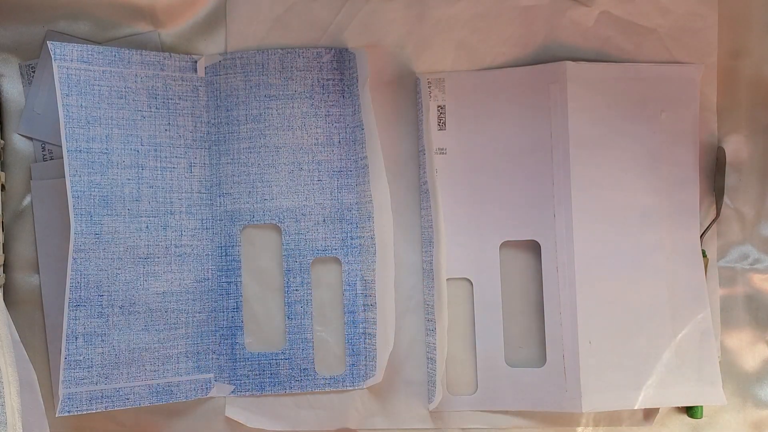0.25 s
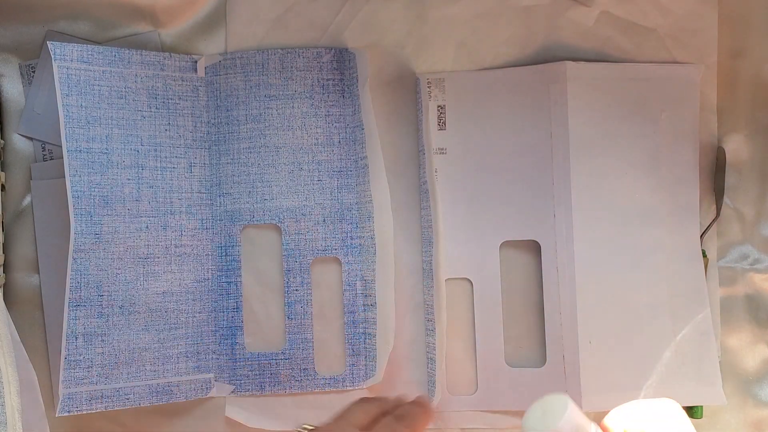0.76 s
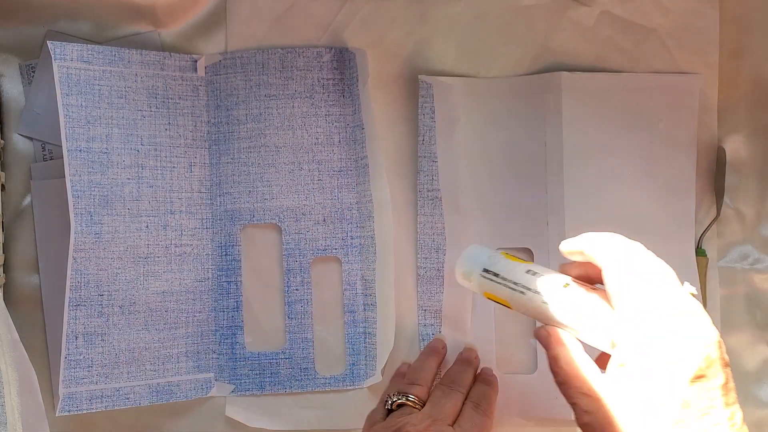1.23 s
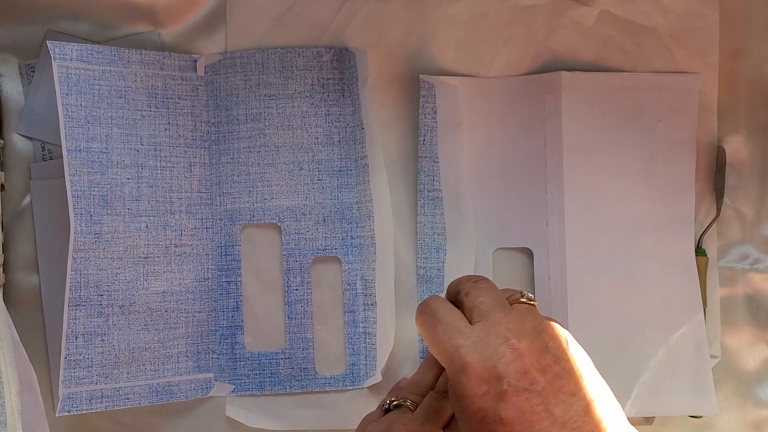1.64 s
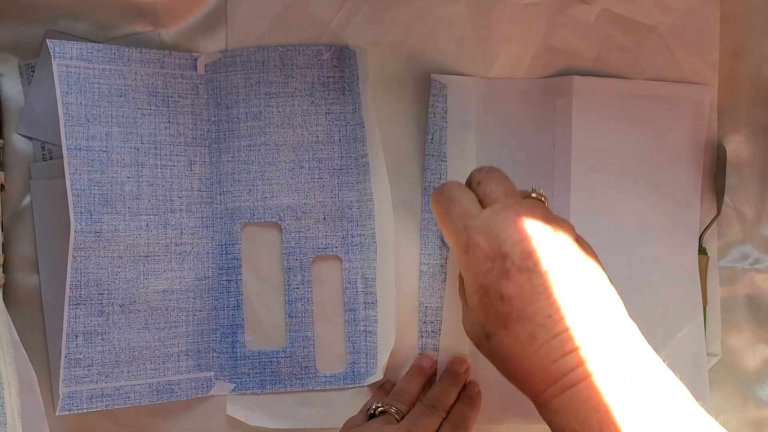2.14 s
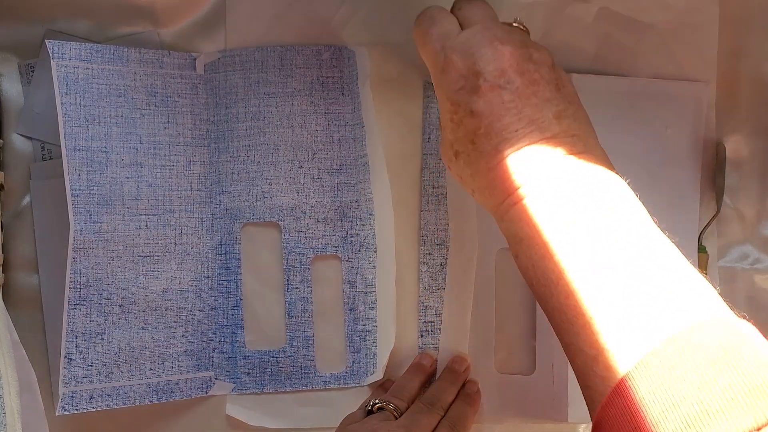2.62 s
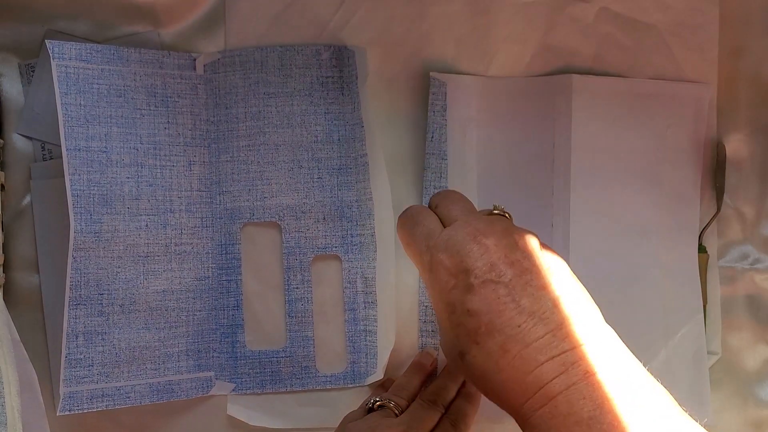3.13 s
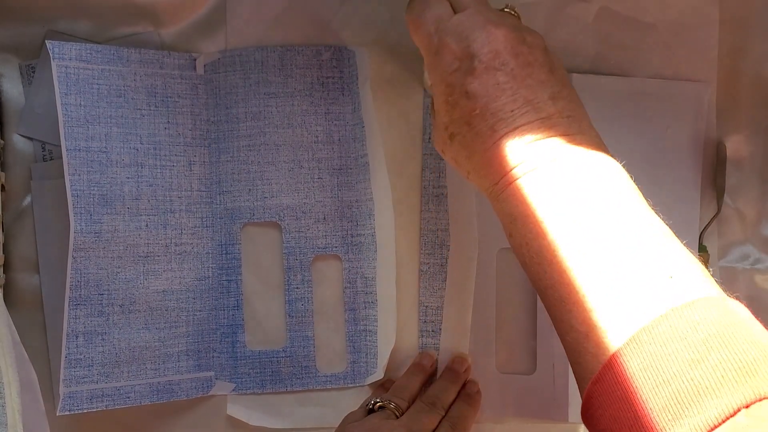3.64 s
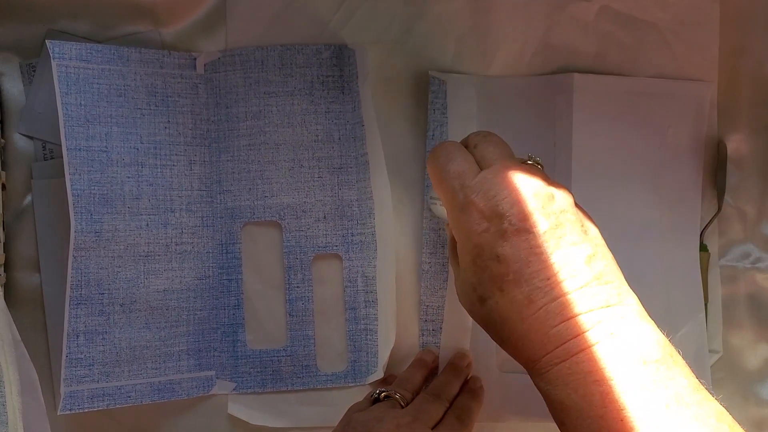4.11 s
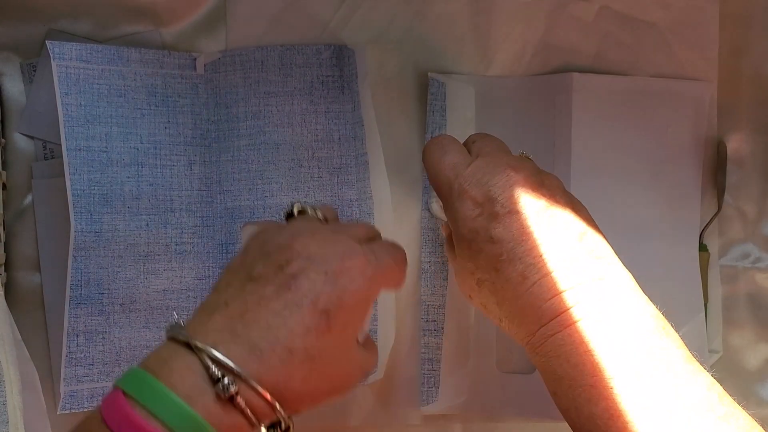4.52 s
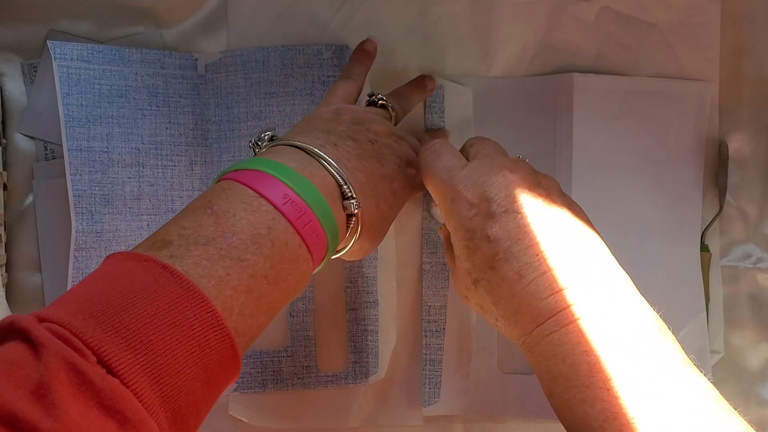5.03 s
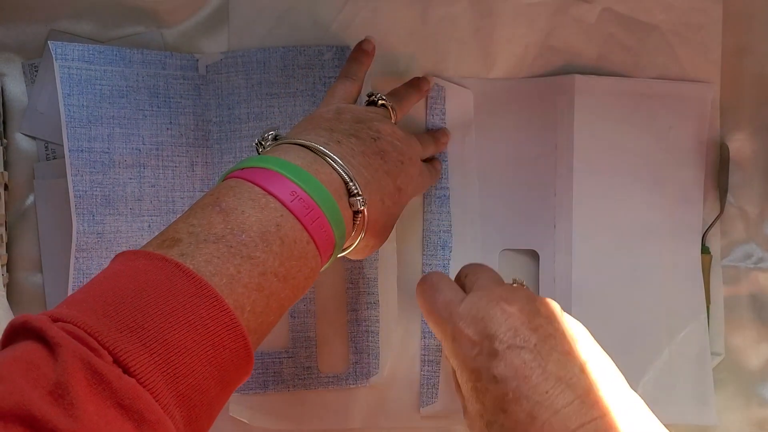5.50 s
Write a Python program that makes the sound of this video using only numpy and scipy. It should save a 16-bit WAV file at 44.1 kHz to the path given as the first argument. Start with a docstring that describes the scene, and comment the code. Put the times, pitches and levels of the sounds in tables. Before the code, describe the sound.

Faint paper scrapes open the scene, close by in a small quiet room with low background noise and a light hiss. At about 0.4 seconds a glue stick's cap comes off with a sharp click and hollow pop. A dry swish and crisp paper ticks follow, and from 0.9 to 1.5 seconds a hand softly slides an envelope. A dull table thud comes at 1.7 seconds. From there the stick rubs along the paper in short, light, tacky scrapes, with very faint sticky snaps. The plastic tube clicks sharply several times between 2 and 2.4 seconds, then more lightly. Stronger low thuds come at about 3.1 and 4.2 seconds, each with plastic knocks nearby, the second with a small hollow pop. Paper ticks and scrapes softly from 4.6 to 5 seconds, and a few light hollow taps of the tube sound around 5.5 seconds.

```python
"""In a small quiet room, a glue stick is uncapped and rubbed along an envelope on a covered table.
Stick-slip friction makes the paper scrape and crackle, and buckling makes it tick. Air resonance
gives the cap its pop, and impacts excite the modes of the plastic tube as it rattles in the hand.
Each press of the stick drives the table's low modes with a thud, and threads of glue snap faintly."""
import sys
import numpy as np
from scipy import signal
from scipy.fft import rfft, irfft, next_fast_len
from scipy.io import wavfile
from scipy.ndimage import uniform_filter1d

SR = 44100
rng = np.random.default_rng(int(sys.argv[2]) if len(sys.argv) > 2 else 0)


def unload_wav(signal):
    """Save mono or channel-first audio to the path in sys.argv[1] as 16-bit WAV at rate SR, clipped to [-1, 1]."""
    wavfile.write(
        sys.argv[1],
        SR,
        np.round(np.clip(np.atleast_2d(signal).T, -1, 1) * 32767).astype(np.int16),
    )


N = 254076

# Spectra of room noise and microphone hiss. Each row: frequency in Hz, relative density in dB.
ROOM_SPECTRUM = [(15, -29), (32, -17), (53, -3.5), (115, -9), (145, -13), (205, -20.5), (275, -5),
                 (380, -11.5), (500, -19), (900, -26.5), (1500, -25), (2200, -28.5), (3000, -28),
                 (7300, -30.5), (8300, -53)]
HISS_SPECTRUM = [(6500, -16.5), (7600, -4), (8500, -17.5), (10300, -8), (11500, 0.5), (12200, 6),
                 (13200, -7), (14600, 5), (15400, 7), (16200, -21.5)]
# Coherence of that noise. Each row: frequency in Hz, left-right correlation.
NOISE_COHERENCE = [(30, 1), (130, 0.53), (300, 0.6), (640, -0.43), (1500, -0.19), (15000, 0.067)]
# Mains hum. Each row: frequency in Hz, level in dB.
MAINS_HUM = [(172, -73)]
# Colour of the microphone. Each row: frequency in Hz, relative gain in dB.
MIC_RESPONSE = [(150, 8.5), (400, 7.5), (850, -1), (1400, 4.5), (3400, 4), (4200, 4), (7300, 9),
                (8400, -1.5), (10300, -2), (12300, 3), (15500, 6), (16500, -23)]
# Phase between its two ports. Each row: frequency in Hz, lead of the right port in radians.
PORT_PHASE = [(200, 0.18), (700, 1), (2500, 0.051), (8000, 1), (15000, 1)]
# Five frequency bands. Each entry: a band edge in Hz.
BAND_EDGES = [350, 1100, 2400, 4300, 8000, 16000]
# Resonances of the hollow tube and the sheet under it. Each row: frequency in Hz, width in Hz, gain in dB.
TUBE_MODES = [(580, 120, -12.5), (1120, 450, -4.5), (1770, 660, -5.5), (2533, 154, -3), (3050, 146, -3),
              (3380, 115, -0.5), (4830, 230, 3.5), (5580, 1700, -0.5), (6630, 124, -12)]
# Short scrapes. Each row: time of the peak in seconds, length in seconds, level in dB, tackiness 0 to 1.
PAPER_SCRAPES = [(0.024, 0.081, -65.5, .3), (0.094, 0.1, -63, 0.2), (0.193, .2, -71.5, 0.26),
                 (0.44, 0.018, -51, 0.1), (0.47, .11, -56, 0.9), (0.837, 0.14, -62.5, 0.36),
                 (1.043, .08, -59, 0.86), (1.236, 0.19, -61.5, 0.9), (1.353, .1, -68.5, .9),
                 (1.794, 0.12, -56, 0.72), (1.872, .09, -65, 0.95), (2.117, 0.11, -61, .65),
                 (2.169, 0.08, -49.5, 0.7), (2.353, .05, -51, 0.5), (2.456, 0.2, -68, 0.9),
                 (2.69, .3, -70, 0.98), (2.87, 0.079, -66, 0.9), (3.149, .09, -63, 0.99),
                 (3.242, 0.041, -52, 0.7), (3.354, 0.075, -65.5, .45), (3.442, 0.12, -71.5, 1),
                 (3.663, 0.18, -63.5, 0.98), (3.807, 0.093, -60.5, 0.97), (4.239, 0.09, -62.5, 0.97),
                 (4.372, 0.13, -56, 0.63), (4.699, 0.42, -65.5, 0.46), (5.549, .22, -71, 0.97)]
# Paper buckling under the fingers. Each row: start in seconds, level in dB, tilt in dB per octave.
PAPER_TICKS = [(0.1746, -56.5, 2), (0.3324, -61.5, 2), (0.4262, -55.5, 4), (0.546, -46.5, 0.5),
               (0.6136, -46, 8.5), (0.662, -53, 12), (0.8109, -50, 2.5), (0.8605, -51, 4.5),
               (0.9451, -53, -0.5), (2.179, -53.5, 8.5), (4.645, -53.5, -2.7), (4.6962, -58.5, 7),
               (4.7327, -53.5, -1.5), (4.7793, -46, -1.5), (4.8866, -61.5, -3.5), (4.9897, -57, -4.6)]
# Spectrum of a tick before its tilt. Each entry: relative level of one band in dB.
TICK_SPECTRUM = [-14.5, -22, -18.5, -2.5, -0.5]
# Hollow notes as the cap comes off and, later, as the tube is set down.
# Each row: start in seconds, level in dB, note in Hz, lift of that resonance in dB.
CAVITY_POPS = [(0.3969, -35.5, 1870, 12), (0.3993, -33.5, 2600, 30), (0.452, -45.5, 580, -5),
               (0.503, -53, 550, -8), (4.1761, -46.5, 565, 17), (4.243, -46.5, 2100, 19),
               (5.473, -47.5, 608, 12), (5.618, -53.5, 680, -3)]
# Impacts on the plastic tube. Each row: start in seconds, level in dB, favoured resonance in Hz,
# loss one octave above it in dB, decay constant in seconds.
TUBE_KNOCKS = [(0.445, -26, 13000, 3, 0.0042), (0.449, -27.5, 3050, -0.5, 0.0017),
               (0.502, -44, 1470, 2.5, .011), (1.9868, -41.5, 3050, 14.5, 0.0049),
               (2.1594, -33, 5160, 3.5, 0.00086), (2.208, -47, 3300, 4, 0.00063),
               (2.2271, -25, 3230, 7.5, 0.0027), (2.3468, -35.5, 7300, 12, 0.0062),
               (2.3614, -30.5, 3360, 18, 0.0021), (2.3639, -30, 5350, 12.5, .0025),
               (2.4616, -52, 6900, 10, 0.0021), (2.5306, -49, 2310, 7.5, 0.0023),
               (2.6717, -49.5, 5570, 4, 0.0021), (2.7418, -56, 1900, 3, 0.0028),
               (2.858, -56.5, 3820, 6, 0.0043), (3.0962, -56.5, 3100, 13, 0.0076),
               (3.2423, -38, 2300, 2.5, 0.0078), (3.252, -37.5, 1440, 3, 0.0052),
               (3.576, -52, 5350, 18, 0.0015), (3.6965, -42.5, 1770, 0.24, 0.0023),
               (3.7886, -52.5, 1200, 3, .0028), (3.963, -49, 2420, 15, 0.0031),
               (4.1675, -51, 3600, 15, 0.00083), (4.178, -39.5, 2020, 15.5, 0.008),
               (4.243, -50, 2450, 12, .0032), (4.3789, -37.5, 4700, 10, 0.0006),
               (5.3056, -60.5, 580, 3, .0053), (5.4625, -44.5, 2860, 11.5, 0.0023),
               (5.473, -47.5, 3420, 11.5, 0.0056), (5.5213, -53.5, 4180, 7, 0.0018),
               (5.6152, -44.5, 3390, 20.5, 0.0067)]
# Presses on the table. Each row: start in seconds, peak level in dB, contact time in seconds.
TABLE_PRESSES = [(0.4516, -35, 0.0023), (0.504, -36, 0.00089), (1.243, -49, 0.00056), (1.283, -43, 0.0097),
                 (1.321, -49.5, 0.0038), (1.658, -29.5, 0.0052), (1.873, -48, 0.0057),
                 (3.1488, -25.5, 0.0032), (4.2329, -24, 0.0038), (4.362, -46, 0.0017),
                 (4.427, -41.5, 0.011), (4.541, -43, 0.0025), (4.789, -45.5, 0.0064)]
# Modes of the table. Each row: frequency in Hz at a pitch ratio of 1, level in dB, T60 in seconds.
TABLE_MODES = [(66, -7, 0.32), (79.4, 4, 0.16), (108.8, 4, 0.18), (137.3, 4.5, 0.077), (191, -5.5, 0.071),
               (287, -2.5, 0.048), (375, -8.5, 0.089), (580, -19, .04)]
# A dry swish after uncapping, then the hand sliding the envelope into place.
# Each row: time in seconds, level in dB before the slide's gain.
SWISH_CURVE = [(0.48, -54), (0.54, -39.5), (0.565, -46.5), (0.585, -47), (0.605, -57), (0.625, -46.5),
               (0.67, -45), (0.73, -63.5), (0.765, -61), (0.79, -70)]
SLIDE_CURVE = [(0.93, -75), (0.95, -57.5), (1.022, -60.5), (1.036, -47), (1.094, -60.5), (1.16, -53),
               (1.186, -58), (1.286, -74), (1.326, -75), (1.342, -62), (1.43, -82), (1.496, -61),
               (1.58, -102)]
# Strokes that draw threads of glue. Each row: start in seconds, end in seconds.
GLUE_STROKES = [(2.401, 2.6), (3.3, 3.85), (4.898, 6.2)]
# Friction spectra of bare and gluey paper. Each entry: relative level in dB of one of the upper four bands.
DRY_DB, TACKY_DB = [-24.5, -11.5, -2, 1.5], [1.5, -3.5, -5, -10]


def amp(db):
    """Amplitude ratio for a level in decibels."""
    return 10 ** (np.asarray(db) / 20)


def unit(x):
    """Normalisation to an rms of 1."""
    return x / np.sqrt(np.mean(x ** 2) + 1e-20)


def curve_at(points, hz):
    """Interpolation on a logarithmic frequency axis."""
    frequencies, values = np.transpose(points)
    return np.interp(np.log(hz + 1), np.log(frequencies + 1), values)


def band_octaves(hz):
    """Interval in octaves from hz up to the geometric centre of each band."""
    edges = np.array(BAND_EDGES, float)
    return np.log2(np.sqrt(edges[:-1] * edges[1:]) / hz)


def add(mix, start, sound):
    """Superposition: a stereo sound joins the mix at start seconds."""
    part = mix[:, max(round(start * SR), 0):][:, :sound.shape[1]]
    part += sound[:, :part.shape[1]]


def noise_pair(size, coherence):
    """Partial coherence: two channels of white noise share a component."""
    shared, separate = rng.standard_normal((2, size))
    return np.array([shared, coherence * shared + np.sqrt(1 - coherence ** 2) * separate])


def resonate(drive, band_db, seconds, modes, lean_db):
    """Resonant filtering, with each band scaled toward the energy of band_db held for so many seconds."""
    size = next_fast_len(drive.shape[1] + 2048)
    hz = np.fft.rfftfreq(size, 1 / SR)
    body = 1 + sum(amp(db) / (1 + 2j * (hz - centre) / width) for centre, width, db in modes)
    spectrum = rfft(drive, size) * body * amp(curve_at(MIC_RESPONSE, hz))
    power = 2 * np.mean(abs(spectrum) ** 2, 0) / (size * SR * seconds)
    gains = []
    for low, high, db in zip(BAND_EDGES, BAND_EDGES[1:], band_db):
        gain_db = db - 10 * np.log10(power[(hz >= low) & (hz < high)].sum() + 1e-20)
        gains += [(low * 1.12, gain_db), (high / 1.12, gain_db)]
    bass_cut = hz ** 2 / (hz ** 2 + 170 ** 2)
    balance = amp(np.outer([-1, 1], lean_db * (hz / BAND_EDGES[-1] - .3)))  # positive: treble to the right
    phase = np.exp(.5j * np.outer([-1, 1], curve_at(PORT_PHASE, hz)))
    return irfft(spectrum * amp(curve_at(gains, hz)) * bass_cut * balance * phase, size)


def room_tone(room_db=-63, hiss_db=-70):
    """Stationary noise of room and microphone, with a faint hum that wavers by phase modulation."""
    hz, t = np.fft.rfftfreq(N, 1 / SR), np.arange(N) / SR
    shared, separate = rfft(rng.standard_normal((2, N)))
    coherence = curve_at(NOISE_COHERENCE, hz)
    white = np.array([shared, coherence * shared + np.sqrt(1 - coherence ** 2) * separate])
    room = amp(room_db) * unit(irfft(white * amp(curve_at(ROOM_SPECTRUM, hz)), N))
    hiss = amp(hiss_db) * unit(irfft(white * amp(curve_at(HISS_SPECTRUM, hz)), N))
    waver = unit(uniform_filter1d(rng.standard_normal(N), size=9000))
    hum = sum(amp(db) * unit(np.sin(2 * np.pi * f * t + 0.14 * waver)) for f, db in MAINS_HUM)
    return room + hiss + hum


def friction(speed, db, tack, tube_db, dry_slips_per_s=2200, tacky_slips_per_s=190):
    """Stick-slip friction: fibres and glue catch and let go; tacky paper slips less often and is duller."""
    size = len(speed)
    slips_per_s = dry_slips_per_s * (tacky_slips_per_s / dry_slips_per_s) ** (tack ** 2)
    slipping = rng.random(size) < slips_per_s / SR
    strength = amp(3 * np.minimum(rng.exponential(1, size), 4))
    slips = slipping * strength * rng.choice([-1, 1], size)
    t = np.arange(int(.06 * SR)) / SR
    sheet_ring = noise_pair(len(t), 0.12) * np.exp(-t / 0.00068)
    sheet_tail = noise_pair(len(t), 0.066) * amp(-6 - 60 * t / 0.091)
    crackle = signal.fftconvolve(slips[None], sheet_ring + sheet_tail, axes=1)[:, :size]
    judder = amp(2 * unit(uniform_filter1d(rng.standard_normal(size), size=300)))
    smooth_rub = np.interp(tack, [0, 1], [0.91, 0.093]) * noise_pair(size, .2)
    drive = (unit(crackle) + smooth_rub) * speed * judder
    band_db = db + (1 - tack) * np.array(DRY_DB) + tack * np.array(TACKY_DB)
    modes = [(hz, width, level + tube_db) for hz, width, level in TUBE_MODES]
    return resonate(drive, [band_db[0] - 8, *band_db], size / SR, modes, lean_db=-0.5)


def paper_scrape(peak_time, length, db, tack, rise_share=.37):
    """Friction noise follows sliding speed, which rises and falls over a short rub."""
    rise = rise_share * length
    t = np.arange(0, length, 1 / SR)
    speed = np.sin(np.pi / 2 * np.interp(t, [0, rise, length], [0, 1, 0])) ** 3
    return peak_time - rise, friction(speed, db, tack, tube_db=-4)


def click(start, band_db, note_hz, lift_db, ring_s, snap_share, lean_db, note_q=15):
    """Impulse response: a snap, dense damped ringing, then reflections from table and room."""
    t = np.arange(int(.35 * SR)) / SR
    ringing = noise_pair(len(t), .55) * np.exp(-t / ring_s) * (1 - np.exp(-t / 0.00098))
    tail = amp(-16 - 60 * t / .11) + amp(-37 - 60 * t / .4)
    tail *= np.sqrt(ring_s / 0.0024) * (1 - np.exp(-t / 0.0013))  # a longer ring feeds the room more
    decay = unit(ringing + noise_pair(len(t), .1) * tail)
    snap = np.sqrt(snap_share * len(t)) * (t == 0)
    lead = 128
    drive = np.pad(np.sqrt(1 - snap_share) * decay - snap, ((0, 0), (lead, 0)))
    modes = [*TUBE_MODES, (note_hz, note_hz / note_q, lift_db)]  # the contact point favours one resonance
    return start - lead / SR, resonate(drive, band_db, 0.0074, modes, lean_db)


def paper_tick(start, db, tilt_db, note_hz=6840):
    """Buckling: the sheet gives way suddenly with a thin, bright tick."""
    band_db = db + np.array(TICK_SPECTRUM) + tilt_db * band_octaves(note_hz)
    return click(start, band_db, note_hz, lift_db=6, ring_s=0.0015, snap_share=0.039, lean_db=0.5)


def cavity_pop(start, db, note_hz, lift_db, width_octaves=0.7, skirt_db=-24.5):
    """Cavity resonance: the air in the cap or tube rings briefly around one note."""
    bell_curve = np.exp(-.5 * (band_octaves(note_hz) / width_octaves) ** 2)
    band_db = db + skirt_db * (1 - bell_curve)
    return click(start, band_db, note_hz, lift_db, ring_s=0.0023, snap_share=0.049, lean_db=-4)


def tube_knock(start, db, note_hz, loss_db, ring_s, hard_db=-25):
    """Impact excitation: the tube rings over a hollow thump, and a harder knock snaps more."""
    octaves = band_octaves(note_hz)
    force_db = min(db - hard_db, 0)
    band_db = db - 8 * np.maximum(-octaves, 0) - loss_db * np.maximum(octaves, 0) ** 1.35
    thump_db = -52 + 0.41 * force_db
    band_db[0] = max(band_db[0], thump_db)
    snap_share = 0.27 * amp(0.52 * force_db)
    lift_db = 10 - 24 * snap_share  # the resonance stands out less in a hard knock
    return click(start, band_db, note_hz, lift_db, ring_s, snap_share, lean_db=-0.5)


def table_thud(start, db, contact_s, firm_db=-38.5, lead_s=.03):
    """Forced vibration: a soft push swings the table's modes while the paper flattens with a scuff."""
    t = np.arange(int(.4 * SR)) / SR
    pitch_ratio = 1.01 + 0.1 * max(firm_db - db, 0)  # light presses ring higher
    modes = sum(amp(level - 60 * t / t60) * np.sin(2 * np.pi * hz * pitch_ratio * t)
                for hz, level, t60 in TABLE_MODES)
    push = np.sin(np.pi * np.clip((t - lead_s) / contact_s, 0, 1)) ** 2
    low_cut = signal.butter(5, 48, "high", fs=SR, output="sos")
    swing = signal.sosfilt(low_cut, signal.fftconvolve(modes, push)[:len(t)])
    muffle = signal.butter(2, [200, 520], "band", fs=SR, output="sos")
    scuff = unit(signal.sosfilt(muffle, noise_pair(len(t), 0.59))) * np.exp(-abs(t - lead_s) / 0.021)
    scuff *= min(0.0025 / contact_s, 1.2) ** 2  # a slower press scuffs less
    thud = swing / abs(swing).max() + amp(-27) * scuff
    balance = amp([[-.3], [.3]])
    return start - lead_s, amp(db) * thud * balance


def hand_slide(curve, gain_db, tack):
    """Sustained friction follows a level curve; a sliding hand couples only weakly to the tube."""
    times, level_db = np.transpose(curve)
    speed = amp(np.interp(np.arange(times[0], times[-1], 1 / SR), times, level_db))
    mean_db = 10 * np.log10(np.mean(speed ** 2))
    return times[0], friction(unit(speed), mean_db + gain_db, tack, tube_db=-17)


def glue_threads(start, end, snaps_per_s=8, centre_hz=3200):
    """Rupture under tension: threads of glue snap faintly at random moments along a stroke."""
    draws = rng.uniform(-1, 1, (round((end - start) * snaps_per_s), 3))
    for place, strength, octaves in draws:
        onset = start + (end - start) * (place + 1) / 2
        yield tube_knock(onset, -70 + 2.5 * strength, centre_hz * 2 ** octaves, loss_db=3, ring_s=.0015)


def scene():
    """Linear superposition of paper, tube, table and glue over the quiet room."""
    mix = room_tone()
    for source, rows in ((cavity_pop, CAVITY_POPS), (tube_knock, TUBE_KNOCKS), (paper_tick, PAPER_TICKS),
                         (paper_scrape, PAPER_SCRAPES), (table_thud, TABLE_PRESSES)):
        for row in rows:
            add(mix, *source(*row))
    add(mix, *hand_slide(SWISH_CURVE, gain_db=-1, tack=0.078))
    add(mix, *hand_slide(SLIDE_CURVE, gain_db=1.5, tack=0.57))
    for stroke in GLUE_STROKES:
        for snap in glue_threads(*stroke):
            add(mix, *snap)
    return mix


def record(dry):
    """Band limiting: a steep low-pass filter removes the treble above 16.3 kHz."""
    taps = signal.firwin(401, 16300, window=("kaiser", 8), fs=SR)
    return signal.oaconvolve(dry, taps[None], "same")


dry = scene()
out = record(dry)
unload_wav(out)
```